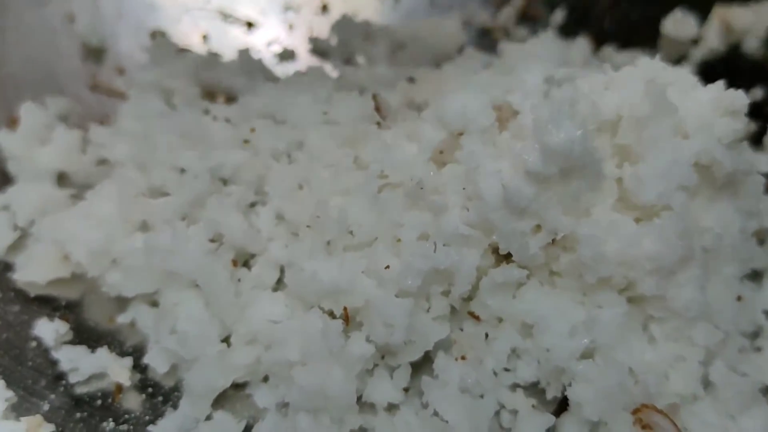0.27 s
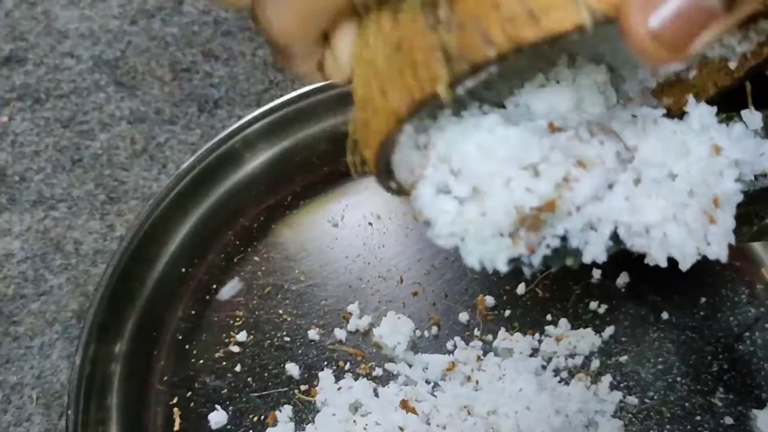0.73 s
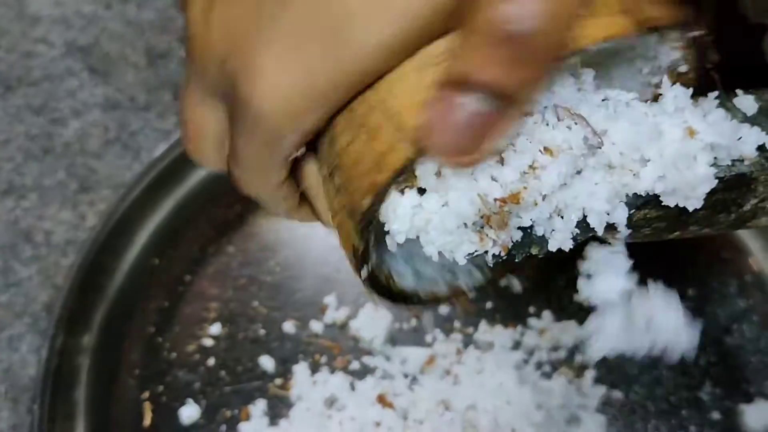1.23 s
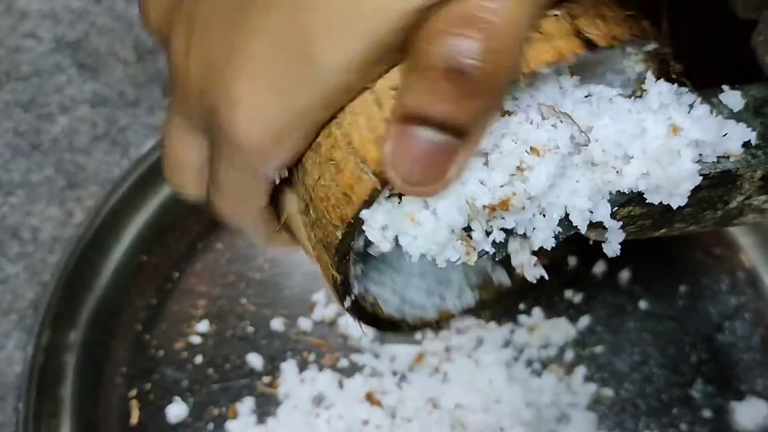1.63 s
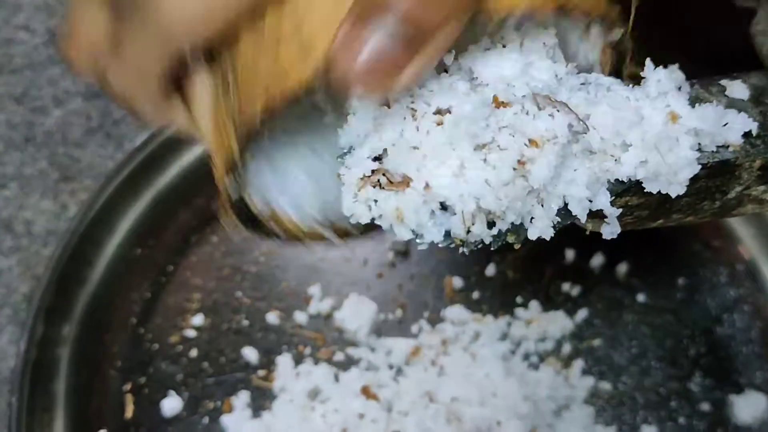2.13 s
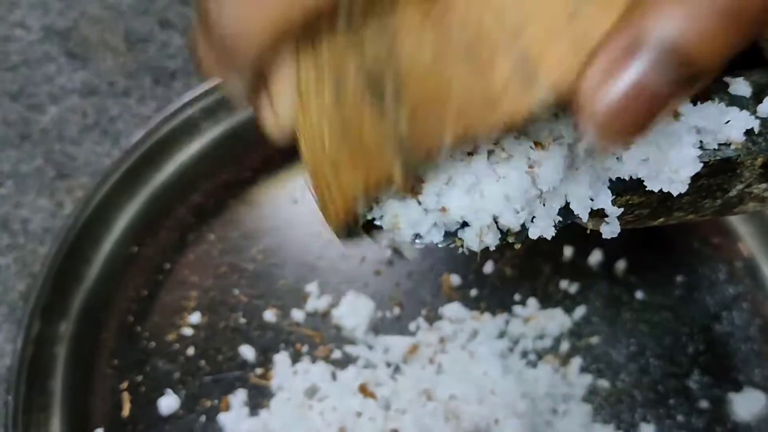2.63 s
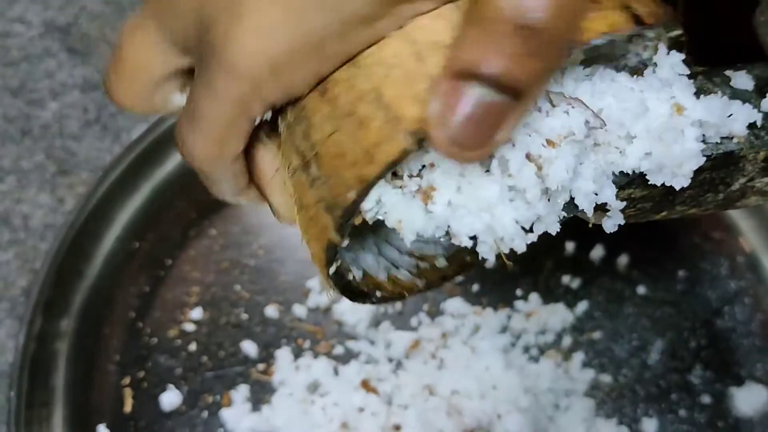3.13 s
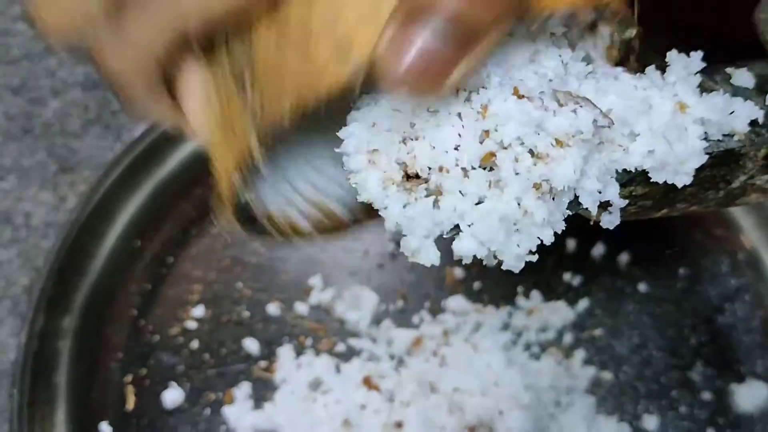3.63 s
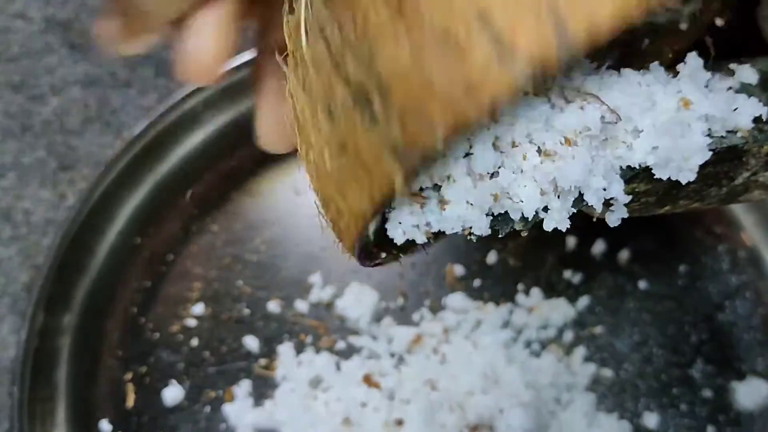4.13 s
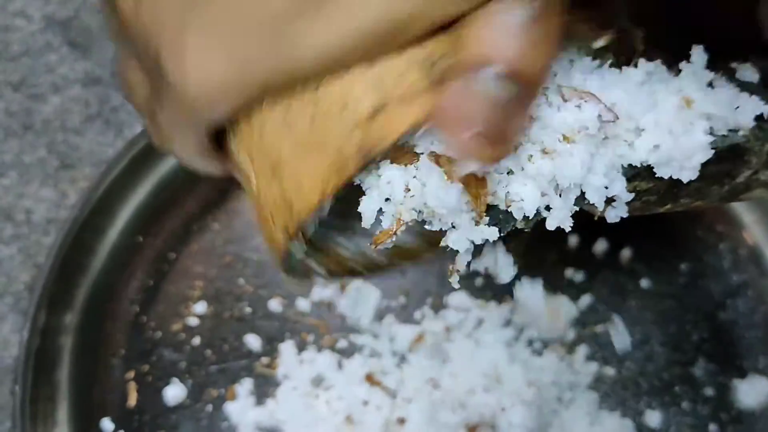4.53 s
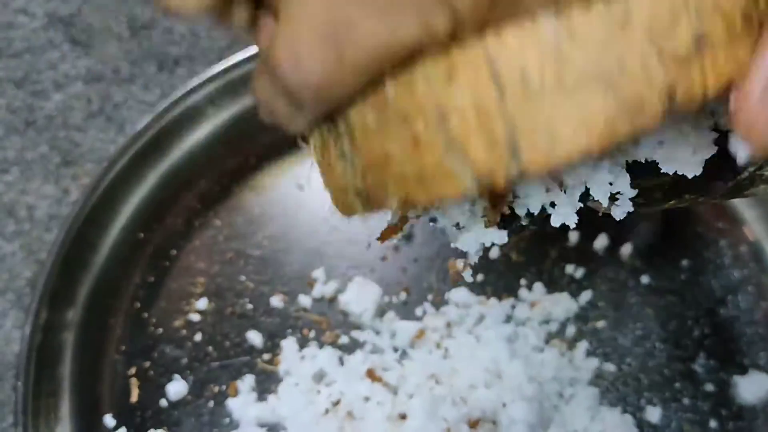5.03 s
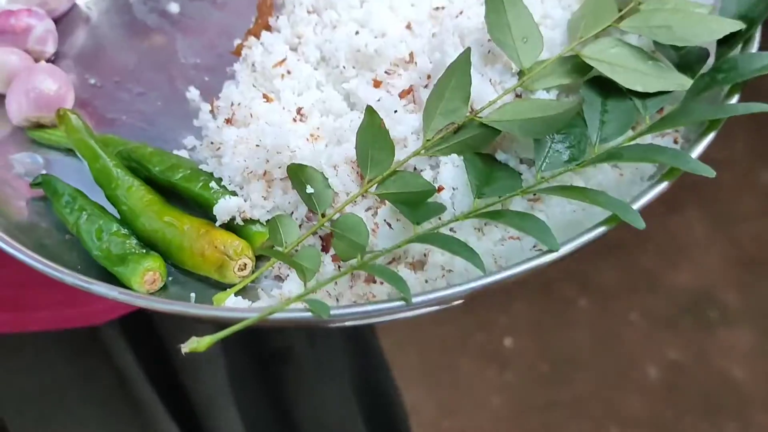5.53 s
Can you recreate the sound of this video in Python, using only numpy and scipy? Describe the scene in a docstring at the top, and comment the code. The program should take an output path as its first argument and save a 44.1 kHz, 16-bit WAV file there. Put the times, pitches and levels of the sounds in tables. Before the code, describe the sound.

Dry, crunchy coconut grating up close, first a single harder scrape, then steady scraping at nearly three strokes a second until a sudden cut.

```python
"""Coconut on a kitchen grater

Half a coconut is worked over the toothed blade of a kitchen grater, nearly three strokes a second.
The teeth tear fibres (bright crackle), rub on the flesh (dry rasp) and stick and slip, so the shell judders.
One harder scrape is heard from close by; the steady strokes follow from another spot and stop abruptly.
Random snaps excite resonances of shell, blade and fibres; filtered noise adds a faint hiss and hush."""
import sys
import numpy as np
from scipy import signal
from scipy.fft import rfft, irfft
from scipy.io import wavfile
from scipy.ndimage import uniform_filter1d

SR = 44100
rng = np.random.default_rng(int(sys.argv[2]) if len(sys.argv) > 2 else 0)


def inscribe(sig):
    """Save sig as 16-bit PCM at rate SR to the path in sys.argv[1].

    A 1-D sig is mono; a 2-D sig holds one channel per row.
    Samples are clipped to [-1, 1] before scaling.
    """
    pcm = np.round(np.clip(np.atleast_2d(sig).T, -1, 1) * 32767)
    wavfile.write(sys.argv[1], SR, pcm.astype(np.int16))


N = 254898
TIME = np.arange(N) / SR

# Levels in the tables are relative: the layers that use them add gains of their own.
NEAR_SPAN_S, GRATING_SPAN_S, BRUSH_SPAN_S = (0, .731), (.772, 5.406), (.785, 5.4)

# a tooth catches and lets go: (time [s], shell level [dB], blade level [dB], fibre level [dB])
NEAR_CATCHES = [(0.0221, -54, -41, -36), (0.0286, -20, -21.5, -38), (0.0953, -26, -22.5, -45),
                (0.152, -26, -30, -41), (0.161, -29, -31, -35), (0.2824, -21, -23, -33),
                (0.362, -24, -24, -30.5), (0.382, -27, -19.5, -37), (0.4006, -23.5, -26.5, -27),
                (0.415, -15.5, -18, -25), (0.4754, -23.5, -23, -30), (0.506, -31.5, -37, -35),
                (0.5694, -48, -27.5, -47), (0.6721, -28, -39.5, -32), (0.6826, -19.5, -9.5, -38),
                (0.714, -23, -10.5, -31), (0.7226, -26, -16, -38)]
CATCHES = [(0.868, -33, -36, -44), (0.889, -21, -50, -39), (0.9409, -23, -30.5, -37),
           (0.965, -26.5, -27.5, -53), (0.986, -32, -24, -27.5), (1.066, -32.5, -27.5, -41),
           (1.153, -44, -26.5, -39), (1.178, -37.5, -36, -64), (1.2235, -26, -20.5, -38),
           (1.332, -15, -31, -40), (1.42, -30, -24, -66), (1.502, -31, -27, -38), (1.528, -37, -34, -55),
           (1.569, -35, -27.5, -33), (1.5826, -23.5, -32, -44), (1.849, -43.5, -28.5, -53.5),
           (1.864, -36.5, -28.5, -52), (1.8826, -25.5, -21, -38), (1.915, -34, -16.5, -37),
           (1.9532, -29, -17, -19), (1.976, -12, -29, -40), (2.0374, -16.5, -35, -33),
           (2.0581, -12.5, -16, -31), (2.155, -41, -39, -47), (2.271, -28, -42, -46),
           (2.339, -25.5, -24.5, -39.5), (2.4215, -23, -40, -30), (2.428, -22.5, -33, -37),
           (2.451, -22.5, -26, -55), (2.4728, -23.5, -30, -53), (2.644, -32.5, -24.5, -51.5),
           (2.687, -30.5, -40, -48), (2.722, -23, -36, -28), (2.8093, -22.5, -32, -40),
           (2.844, -25.5, -24.5, -30.5), (2.924, -38, -45, -58), (3.034, -37, -29, -40.5),
           (3.087, -25.5, -34, -44), (3.1028, -17.5, -38, -26), (3.149, -22.5, -45, -30),
           (3.428, -30, -30, -45), (3.4793, -22, -26.5, -29.5), (3.518, -21, -42, -30),
           (3.599, -28, -28, -29), (3.658, -36, -32, -34.5), (3.766, -16.5, -21, -36),
           (3.7948, -28.5, -15, -24), (3.8115, -14.5, -21, -25.5), (3.929, -19.5, -26, -25),
           (4.124, -41, -31, -47), (4.142, -30, -27.5, -52), (4.1875, -24, -18.5, -36),
           (4.414, -19, -35, -35), (4.4499, -20.5, -25, -34.5), (4.4927, -24, -32, -45),
           (4.731, -18.5, -23, -36), (4.7452, -17.5, -21.5, -39), (4.763, -18.5, -31, -43),
           (4.794, -21, -37, -37), (4.855, -19, -22, -25), (4.869, -28.5, -18.5, -33.5),
           (5.058, -20.5, -31, -47), (5.174, -20.5, -33.5, -34), (5.2402, -16, -18, -31.5),
           (5.249, -19.5, -27, -43.5), (5.29, -21, -32, -47), (5.3476, -30, -38, -49)]
CATCH_VARY_OCT, CATCH_VARY_DB = 0.047, 2.5   # spread of each resonance from catch to catch
# the hardest pushes thump the grater's base: (time [s], level [dB])
THUMPS = [(0.883, -25), (1.948, -24), (1.972, -15.5), (3.432, -27), (4.743, -30)]

# the long close scrape: (time [s], shell level [dB], blade level [dB], fibre level [dB])
NEAR_PUSH = [(0.134, -60, -52, -49), (0.153, -33, -31, -39.5), (0.195, -33, -29, -32.5),
             (0.255, -24.5, -27.5, -34.5), (0.269, -26.5, -33.5, -41), (0.327, -33, -34, -41),
             (0.397, -34, -38.5, -39), (0.419, -30.5, -21, -37.5), (0.428, -28, -29.5, -30.5),
             (0.509, -33.5, -37, -46), (0.544, -52, -62, -59)]
# brief rubs while the shell is set on the blade and taken off:
# (time [s], length [s], shell level [dB], blade level [dB], fibre level [dB])
NEAR_RUBS = [(0.022, 0.056, -39.5, -47.5, -47.5), (0.087, 0.019, -32.5, -45, -49),
             (0.566, 0.011, -37, -49, -52), (0.667, 0.017, -29.5, -34.5, -48), (0.707, 0.01, -24, -29, -41)]
# the teeth bite into the flesh; a forward stroke stalls and goes on in surges:
# (time [s], length [s], shell level [dB], blade level [dB], fibre level [dB], change start to end [dB])
BITES = [(0.859, 0.045, -33, -46, -47.5, 5.5), (0.931, 0.07, -30.5, -44.5, -49, 5.5),
         (1.206, 0.051, -31, -40.5, -40, 5), (1.26, 0.072, -30, -40, -40, 9.5),
         (1.352, 0.022, -30, -45.5, -50.5, -15), (1.571, 0.13, -30, -41.5, -39.5, -1.5),
         (1.73, 0.015, -30.5, -47, -47, -6.5), (1.921, 0.071, -21, -33, -35, 1.5),
         (2.022, 0.06, -25.5, -37, -38, -4), (2.088, 0.031, -33, -45.5, -49, -8.5),
         (2.273, 0.056, -37, -47.5, -47, 3), (2.336, 0.051, -24.5, -38, -36.5, -0.5),
         (2.414, 0.012, -31.5, -40.5, -39.5, -5), (2.455, 0.02, -32, -42, -42.5, -12),
         (2.675, 0.083, -28, -40.5, -40, 4), (2.776, 0.03, -31.5, -44, -40.5, 8),
         (2.854, 0.014, -32.5, -54, -57, -17), (3.006, 0.017, -29.5, -63, -65, 0),
         (3.044, 0.11, -32, -39.5, -40.5, -5.5), (3.174, 0.066, -35.5, -46.5, -42.5, 0),
         (3.411, 0.03, -27.5, -37, -39.5, -1.5), (3.462, 0.084, -33, -42.5, -41.5, -5),
         (3.547, 0.08, -34, -44, -42.5, -4.5), (3.787, 0.025, -23.5, -37, -37, 0.5),
         (3.849, 0.053, -27.5, -40, -35, 2), (3.926, 0.086, -27, -40.5, -38.5, 2),
         (4.031, 0.016, -32, -45, -46, 1), (4.393, 0.064, -25.5, -37, -37, 7),
         (4.485, 0.0082, -30, -34.5, -35.5, -2), (4.72, 0.066, -28, -38.5, -36.5, -4),
         (4.79, 0.077, -25.5, -36, -34, 7.5), (4.876, 0.051, -34.5, -44.5, -40, -5.5),
         (5.035, 0.011, -31.5, -42.5, -36, 11), (5.131, 0.11, -26, -36.5, -34.5, 6.5),
         (5.266, 0.012, -24, -36, -35.5, 5)]
# the shell slides lightly over the teeth between bites:
# (time [s], length [s], shell level [dB], blade level [dB], fibre level [dB])
RETURNS = [(1.135, 0.021, -31.5, -40, -48), (1.472, 0.057, -37.5, -45.5, -65),
           (1.849, 0.085, -41, -42.5, -63), (2.187, 0.077, -38.5, -44.5, -52.5),
           (2.586, 0.07, -36.5, -41.5, -55), (2.97, 0.054, -34, -43.5, -48.5),
           (3.33, 0.064, -32, -39, -48.5), (3.704, 0.12, -35.5, -38.5, -46.5),
           (4.134, 0.029, -32.5, -44, -57), (4.351, 0.04, -32, -40, -42.5), (4.529, 0.021, -40, -45.5, -45),
           (4.654, 0.05, -34.5, -42.5, -45.5), (5.008, 0.11, -45.5, -45, -54)]
# shape of each kind of movement: (attack [dB/s], release [dB/s], rise of the middle above the ends [dB])
BITE_SHAPE, RETURN_SHAPE, RUB_SHAPE = (1200, 680, 1.4), (650, 730, 2.7), (5060, 630, 0.82)
# brushing between strokes: (shell level [dB], blade level [dB], fibre level [dB])
NEAR_BRUSH_DB, BRUSH_DB = (-58, -69.5, -59), (-56, -64.5, -57)
# moments when the shell is lifted clear: (time [s])
LIFTS = [1.435, 2.14, 2.55, 3.285, 4.29]
LIFT_S, LIFT_DB = 0.08, 5   # half length and depth of the lull
# within a bite the shell lurches from tooth to tooth, and blade and fibres follow in part
LURCHES_PER_S, LURCH_DB, RASP_LURCH_DB = 76, 1.98, 0.52

# Resonances, all as (frequency [Hz], width [Hz], left level [dB], right level [dB])
# the hollow shell, the blade and the tearing fibres, from close by
NEAR_SHELL = [(190, 128, -8.5, -11.5), (315.8, 74, 1.5, 3), (422, 260, -1.5, -23.5), (677, 143, 1, 4),
              (847, 370, -7.5, -30)]
NEAR_BLADE = [(1250, 880, -10, -10), (1782, 300, 11, 7.5), (2080, 195, 6.5, -10.5),
              (2410, 330, -10.5, -5.5)]
NEAR_FIBRE = [(2645, 1110, 2.5, -6), (3750, 200, -20, -14.5), (5000, 270, -27, -6.5),
              (6050, 670, -2.5, -19.5), (7060, 1300, -3.5, -2.5), (8700, 2900, -28.5, -6),
              (11400, 7000, -11.5, -24.5), (15771.0, 3300, -7, -13.5)]
# the knock of the shell's rim on the blade, and the thin ring of the teeth, from close by
NEAR_RIM = [(920, 115, 11, 8), (1266, 380, -12, 0), (1670, 250, 10.5, -3), (2060, 180, -9.5, -19),
            (2800, 1000, -12.5, -22)]
NEAR_TEETH = [(2860, 320, 0.0062, -2)]
# shell, blade, fibres and woody rim knock in the steady strokes
SHELL = [(136.3, 110, -32.5, -33.5), (181.8, 31, -17.5, -20.5), (254, 44, -14, -26), (361.2, 84, -6, -6.5),
         (429, 85, 0, -3), (500, 31, -7.5, -18), (636, 56.5, -8, -4), (687.3, 59, -13.5, -2.5),
         (930, 430, -23, -27.5)]
BLADE = [(1090, 320, 1.5, 0), (1473, 95, -3.5, -1.5), (1820, 710, -0.5, 1.5), (2095, 17, 9, -37.5),
         (2444, 450, 4.5, -3)]
FIBRE = [(3194, 460, 4.5, -5), (3650, 1180, -5, -25.5), (5060, 758, -11, -11), (6440, 1180, -1, -14),
         (7500, 1900, -30.5, -4), (9820, 2640, -9.5, -13), (12820, 2541.0, -23, -21.5),
         (17800, 6400, -2.5, -9.5)]
RIM = [(885, 160, -2, -25), (1140, 970, 5.5, 7), (1660, 120, -15.5, 7.5), (2430, 380, 0, 0.5)]
# the grater's base
BASE = [(132, 23, -22.5, -16), (190, 25, 10, 7), (254, 140, -2.5, -8)]
# the light slide, the shell's hollow during it, and its thin wet hiss
SLIDE = [(1150, 900, 1, 2), (2030, 540, -3.5, 1), (2465, 500, -1.5, -23)]
HOLLOW = [(1260, 390, -7.5, 0.0013)]
WET_HISS = [(3310, 960, 1.5, -9.5), (3920, 820, -2, -4), (6630, 2100, 2, -4), (7440, 1600, -10.5, 3),
            (9800, 2500, -12, -10.5), (12700, 3700, -8.5, -13.5), (15500, 2840, -5.5, -15)]
# chips of flesh that break off under load; each chip rings at one of these
CHIPS = [(961, 370, 4, -0.5), (1396, 150, -5.5, -5.5), (1770, 160, 4.5, 1), (2120, 170, 5.5, 0.5),
         (2500, 190, 4, 0), (2880, 200, -3.5, -11.5), (3263, 220, 1.5, -8), (3690, 240, -1, -6)]
# the teeth on the bare, less damped shell
BARE = [(700, 100, 4, 6.5), (796, 210, -7, 0), (1792, 360, 0, -3.5), (2500, 380, -7, -6.5),
        (3410, 530, 0.5, -6.5)]
# thin wet rustle of the shreds
SQUISH = [(7160, 900, 2.5, -4.5), (9860, 1300, 0, -5.5)]

NEAR_SINK_OCT_PER_S = 0.27   # the blade's ring sinks through the close scrape
NEAR_TEETH_RISE_OCT_PER_S, NEAR_TEETH_DB = 0.93, -4.5   # the teeth's ring climbs; gain against the fibres
SLIDE_RISE_OCT_PER_S, SLIDE_RANGE_OCT = 3.4, 0.15   # the hollow ring rises as the shell is drawn back
SHELL_WANDER_OCT = .08   # the shell's ring wanders as the grip on it changes
FIBRE_WANDER_OCT = .04   # the colour of the close tearing wanders as the shell turns
FLICKER_PER_S = 60   # how fast the colour of the tearing changes
CHIPS_PER_S, CHIP_DB = 700, -4.5   # gain against the blade's rasp
# as the flesh wears thin the teeth reach the hard shell: (from [s], full by [s])
BARE_SPAN_S, BARE_DB = (3.44, 4.12), -1
SQUISH_DB, SQUISH_FOLLOWS, SQUISH_WANDER_OCT = -27.5, 0.63, 0.055   # gain, share of the fibres' swing, wander

# spectra of the faint hiss under the strokes and of the hush: (frequency [Hz], level per Hz [dB])
HISS = [(40, -4), (400, 15), (700, 2), (1500, -0.5), (3000, 2.5), (4700, -33), (7200, -12.5), (9000, -25.5),
        (13000, -11.5), (16000, -8)]
HUSH = [(24, -55.5), (40, -20), (262, -3.5), (312, -6.5), (382, -0.5), (433, -6), (1210, -14),
        (1590, -17.5), (16000, -30.5)]
HISS_DB, HUSH_DB, HUSH_SWELL_DB_PER_S = -58.5, -93.5, 24
OPENING_DB, OPENING_S = 13.5, .2   # how low the hiss starts, and time constant of its rise
# weak early echoes: (delay [s])
ECHO_DELAYS_S = (.0013, .0029, .0047)
CUTOFF_HZ = 15950


def from_db(db):
    """Logarithmic level: decibels to amplitude gain."""
    return 10 ** (np.asarray(db) / 20)


def rms_one(x):
    """Mean-square normalisation: scale to unit power."""
    return x / np.sqrt(np.mean(x ** 2) + 1e-20)


def during(span):
    """Gating: one inside the span, zero outside, with short ramps."""
    inside = (TIME >= span[0]) & (TIME < span[1])
    return uniform_filter1d(inside * 1., size=128)


def drift(rate):
    """Band-limited randomness: chance values joined by straight lines, with spread 1."""
    knots = rng.standard_normal(4096)
    return rms_one(np.interp(TIME * rate, np.arange(len(knots)), knots))


def air(spectrum, apart):
    """Spectral shaping: white noise filtered to a given colour, partly shared by both sides; unit power."""
    hz, db = np.transpose(spectrum)
    log_hz = np.log(np.fft.rfftfreq(N, 1 / SR) + 1)
    gain = from_db(np.interp(log_hz, np.log(hz), db))
    white = rng.standard_normal(N) + apart * rng.standard_normal((2, N))
    return rms_one(irfft(rfft(white) * gain, N))


def touching():
    """Loss of contact: gain of light contact and hiss, which die down while the shell is lifted clear."""
    lifted = sum(np.exp(-((TIME - s) / LIFT_S) ** 2) for s in LIFTS)
    return from_db(-LIFT_DB * lifted)


def opening():
    """Exponential approach: gain of the hiss and the light fibre sound as the steady strokes begin."""
    since_start = (TIME - GRATING_SPAN_S[0]).clip(0)
    return from_db(-OPENING_DB * np.exp(-since_start / OPENING_S))


def response(modes, size=2048):
    """Modal resonance: minimum-phase impulse response at the left and right microphone, mean energy one."""
    hz = np.fft.rfftfreq(size, 1 / SR)[:, None] + 1
    centre, width = np.transpose(modes)[:2]
    detuning = (hz ** 2 - centre ** 2) / (hz * width)
    shapes = 1 / (1 + detuning ** 2) ** 2
    power = shapes @ from_db(np.array(modes)[:, 2:]) ** 2
    cepstrum = irfft(np.log(power.T + 1e-9) / 2)
    cepstrum[:, 1:size // 2] *= 2      # minimum phase: nothing rings before the blow
    cepstrum[:, size // 2 + 1:] = 0
    return rms_one(irfft(np.exp(rfft(cepstrum)))) / np.sqrt(size)


def ring(force, modes):
    """Linear response: convolve a force with the impulse response of the resonances."""
    return signal.oaconvolve(np.atleast_2d(force), response(modes), axes=1)[:, :N]


def grains(per_s, spread_db, apart):
    """Shot noise: random snaps of uneven size; apart sets how differently each reaches the two sides."""
    born = rng.random(N) < per_s / SR
    size = from_db(spread_db * np.minimum(rng.exponential(1, N), 4))
    signs = rng.choice([-1, 1], N) + apart * rng.standard_normal((2, N))
    snaps = born * size * signs
    # divide by the short-term level, so chance clusters of snaps do not stand out
    power = uniform_filter1d(np.mean(snaps ** 2, axis=0), size=1300).clip(0)
    return snaps / np.sqrt(power + 1e-9)


def stick_slip(rate, depth_db):
    """Stick-slip friction: the grip of the teeth tightens and gives way unevenly; power held near one."""
    grip = from_db(depth_db * drift(rate))
    return grip / np.sqrt(uniform_filter1d(grip ** 2, size=2000))


def even_level(sound):
    """Level evening: divide a sound by its own short-term level, so the envelopes alone set its loudness."""
    power = uniform_filter1d(np.mean(sound ** 2, axis=0), size=1100)
    return sound / np.sqrt(np.abs(power) + 1e-6)


def glide(sound, octaves):
    """Variable-rate reading: shift a sound by a changing number of octaves."""
    at = np.cumsum(2 ** octaves) % N
    return np.array([np.interp(at, np.arange(N), side) for side in sound])


def one_by_one(force, modes, flicker_db):
    """Independent modes: each snap rings just one resonance, and each resonance swells and fades by itself."""
    dealt = rng.integers(0, len(modes), N)
    energy = np.array([width * np.sum(from_db(sides) ** 2) for _, width, *sides in modes])
    gains = np.sqrt(energy / energy.mean())
    total = 0
    for k, mode in enumerate(modes):
        share = force * (dealt == k) * stick_slip(FLICKER_PER_S, flicker_db)
        total = total + gains[k] * ring(share, [mode])
    return total


def catches(times, level_db, modes, crumble, crumble_s, build_s=0.0012):
    """Impulsive release: fibres start to give, the tooth lets go and crumbling follows, each time recoloured."""
    out = np.zeros((2, N + SR))
    lead = 512   # samples before the release
    age = (np.arange(3 * lead) - lead) / SR
    envelope = np.exp(np.minimum(age / build_s, -age / crumble_s))
    scale = np.hypot(1, crumble) / np.abs(response(modes)).max()
    for s, db in zip(times, level_db):
        crumbs = rng.standard_normal(len(age)) * envelope
        blow = crumble * crumbs / np.linalg.norm(crumbs)
        blow[lead] += 1
        own = np.array(modes, float)   # each spot of contact has its own colour
        own[:, 0] *= 2 ** (CATCH_VARY_OCT * rng.standard_normal(len(own)))
        own[:, 2:] += CATCH_VARY_DB * rng.standard_normal((len(own), 1))
        sound = signal.fftconvolve(blow[None], response(own), axes=1)
        at, length = round(s * SR) - lead, sound.shape[1]
        out[:, at:at + length] += from_db(db) * scale * rms_one(sound) / np.sqrt(length)
    return out[:, :N]


def left_late(x, lag_s):
    """Interaural delay: the source lies a little nearer the right microphone."""
    return np.array([np.interp(TIME - lag_s, TIME, x[0]), x[1]])


def off_the_plate(x, strength, swing_s):
    """Comb filtering: plate, grater and hands return weak echoes whose delays shift, so the colour wanders."""
    out = x
    for delay_s in ECHO_DELAYS_S:
        echo_time = TIME - delay_s - swing_s * drift(rate=9)
        echo = np.array([np.interp(echo_time, TIME, side) for side in x])
        out = out + strength * echo
    return out / np.sqrt(1 + len(ECHO_DELAYS_S) * strength ** 2)


def kitchen(x, t60, wet_db):
    """Reverberation: the walls return a short, dull tail, different on each side."""
    age = np.arange(16384) / SR
    tail = rng.standard_normal((2, len(age))) * from_db(-60 * age / t60) * (age > .004)
    tail = signal.sosfilt(signal.butter(1, 5000, fs=SR, output="sos"), tail)
    tail /= np.linalg.norm(tail, axis=1, keepdims=True)
    return x + from_db(wet_db) * signal.oaconvolve(x, tail, axes=1)[:, :N]


def stroke(start_s, length_s, levels_db, shape, change_db=0):
    """Envelope of one movement: shell, blade and fibre power in attack, a hold that leans and arches, release."""
    attack_db_per_s, release_db_per_s, arch_db = shape
    along = np.clip((TIME - start_s) / length_s, 0, 1) - .5
    hold_db = change_db * along - arch_db * (2 * along) ** 2
    attack_db = attack_db_per_s * (start_s - TIME).clip(0)
    release_db = release_db_per_s * (TIME - start_s - length_s).clip(0)
    envelope = from_db(np.maximum(hold_db - attack_db - release_db, -120))
    return np.outer(from_db(levels_db), envelope) ** 2


def light_contact(moves, shape, brush_db, span):
    """Addition of powers: the light movements and the brushing between them."""
    brushing = np.outer(from_db(brush_db), during(span)) ** 2
    return brushing + sum(stroke(s, length, levels, shape) for s, length, *levels in moves)


def near_gains():
    """Amplitude from summed power: shell, blade and fibre sound in the close scrape and the rubs around it."""
    s, *levels = np.transpose(NEAR_PUSH)
    push = from_db([np.interp(TIME, s, db) for db in levels]) * during((s[0], s[-1]))
    return np.sqrt(push ** 2 + light_contact(NEAR_RUBS, RUB_SHAPE, NEAR_BRUSH_DB, NEAR_SPAN_S))


def into_push():
    """Time origin: seconds from the middle of the close scrape, held at its ends."""
    start, end = NEAR_PUSH[0][0], NEAR_PUSH[-1][0]
    return np.clip(TIME, start, end) - (start + end) / 2


def near_scrape():
    """Friction-driven resonance: one long hard scrape, with knocks of the shell before, during and after."""
    shell, blade, fibre = near_gains()
    grip = stick_slip(rate=190, depth_db=-1.5)

    judder = even_level(ring(grip * grains(700, spread_db=3.0, apart=.45), NEAR_SHELL))
    judder = shell * glide(judder, SHELL_WANDER_OCT * drift(rate=12))

    rubbing = ring(grains(700, spread_db=1.5, apart=0.46), NEAR_BLADE)
    rasp = blade * grip * glide(rubbing, -NEAR_SINK_OCT_PER_S * into_push())
    teeth = ring(grains(1700, spread_db=11.5, apart=0.57), NEAR_TEETH)
    teeth = glide(teeth, NEAR_TEETH_RISE_OCT_PER_S * into_push())
    rasp += from_db(NEAR_TEETH_DB) * fibre * grip * teeth

    tearing = one_by_one(grains(14000, spread_db=-0.5, apart=1.7), NEAR_FIBRE, flicker_db=1.7)
    tearing = fibre * grip * glide(tearing, FIBRE_WANDER_OCT * drift(rate=14))
    tearing = off_the_plate(tearing, strength=0.37, swing_s=.0001)

    s, shell_db, blade_db, fibre_db = np.transpose(NEAR_CATCHES)
    knocks = from_db(2.5) * catches(s, shell_db, NEAR_SHELL, crumble=0.89, crumble_s=0.0062)
    knocks += from_db(-3.5) * catches(s, blade_db, NEAR_RIM, crumble=0.55, crumble_s=0.0036)
    knocks += from_db(1.0) * catches(s, fibre_db, NEAR_FIBRE, crumble=3.6, crumble_s=0.0016)

    dry = judder + from_db(0.5) * left_late(rasp, lag_s=0.0002) + from_db(3.0) * tearing + knocks
    return kitchen(dry * during(NEAR_SPAN_S), t60=0.035, wet_db=-19.5)


def grating_gains():
    """Amplitude from summed power: shell, blade and fibre sound, and the share of the rasp that is sliding."""
    biting = sum(stroke(s, length, levels, BITE_SHAPE, change_db) for s, length, *levels, change_db in BITES)
    lurch = from_db(np.outer([LURCH_DB, RASP_LURCH_DB, RASP_LURCH_DB], drift(LURCHES_PER_S)))
    light = light_contact(RETURNS, RETURN_SHAPE, BRUSH_DB, BRUSH_SPAN_S) * touching() ** 2
    light[2] *= opening() ** 2   # fibres only
    total = biting * lurch ** 2 + light
    return np.sqrt(total), light[1] / total[1]


def slide_pitch():
    """Cavity tuning: octaves of the hollow ring about its mean as it climbs through each return."""
    middles = np.array([s + length / 2 for s, length, *_ in RETURNS])
    nearest = middles[np.searchsorted((middles[1:] + middles[:-1]) / 2, TIME)]
    return np.clip(SLIDE_RISE_OCT_PER_S * (TIME - nearest), -SLIDE_RANGE_OCT, SLIDE_RANGE_OCT)


def grating_rasp(blade, grip, slide, bite):
    """Friction on flesh, chips and bare shell: rubbing shares the shell's grip; slides skid on their own."""
    rubbing = grip * grains(2200, spread_db=1.1, apart=.7)
    chips = one_by_one(grains(CHIPS_PER_S, spread_db=2.0, apart=.5), CHIPS, flicker_db=3.0)
    skidding = stick_slip(rate=37, depth_db=3.0) * grains(600, spread_db=1.0, apart=0.67)
    rasp = ring(blade * bite * rubbing, BLADE)
    rasp += from_db(CHIP_DB) * blade * bite * glide(chips, 0.067 * drift(rate=18))
    rasp += from_db(-0.5) * one_by_one(blade * slide * skidding, SLIDE, flicker_db=0.0)
    rasp += from_db(-3.5) * blade * slide * glide(ring(skidding, HOLLOW), slide_pitch())
    bare = from_db(BARE_DB) * np.interp(TIME, BARE_SPAN_S, [0, 1])
    harsh = grip * grains(2600, spread_db=1.0, apart=0.88)
    return rasp + ring(bare * blade * bite * harsh, BARE)


def grating_tearing(fibre, slide, bite):
    """Fracture noise: fibres crackle in the bites, hiss wetly in the slides, and shreds rustle."""
    crackle = fibre * stick_slip(rate=150, depth_db=1.5) * grains(14000, spread_db=1.56, apart=3.6)
    tearing = one_by_one(bite * crackle, FIBRE, flicker_db=2.5)
    tearing += one_by_one(slide * crackle, WET_HISS, flicker_db=4.5)
    squish = ring(grains(3000, spread_db=2.0, apart=2.6), SQUISH)
    squish = glide(squish, SQUISH_WANDER_OCT * drift(rate=19))
    swing = fibre ** SQUISH_FOLLOWS * stick_slip(rate=91, depth_db=6)
    return tearing + from_db(SQUISH_DB) * swing * squish


def grating():
    """Common excitation: in stroke after stroke one uneven grip drives the shell's judder and the blade's rasp."""
    (shell, blade, fibre), sliding = grating_gains()
    slide, bite = np.sqrt(sliding), np.sqrt(1 - sliding)
    grip = stick_slip(rate=130, depth_db=2.5)

    judder = even_level(ring(grip * grains(900, spread_db=2.5, apart=0.084), SHELL))
    judder = shell * glide(judder, SHELL_WANDER_OCT * drift(rate=22))
    rasp = grating_rasp(blade, grip, slide, bite)
    tearing = grating_tearing(fibre, slide, bite)

    s, shell_db, blade_db, fibre_db = np.transpose(CATCHES)
    thuds = from_db(-3.5) * catches(s, shell_db, SHELL, crumble=1.06, crumble_s=0.0071, build_s=.004)
    thuds += from_db(-10.0) * catches(*np.transpose(THUMPS), BASE, crumble=0.062, crumble_s=0.0053)
    clacks = from_db(-4.0) * catches(s, blade_db, RIM, crumble=1.32, crumble_s=0.0045, build_s=.003)
    snaps = from_db(-1.0) * catches(s, fibre_db, FIBRE, crumble=4.0, crumble_s=0.0055, build_s=.005)

    body = from_db(-5.0) * judder + thuds + clacks
    edge = left_late(from_db(-0.75) * rasp, lag_s=0.00019) + from_db(-0.5) * tearing + snaps
    dry = left_late(body, lag_s=.00008) + off_the_plate(edge, strength=0.36, swing_s=0.000396)
    return kitchen(dry, t60=0.15, wet_db=-18.5) * during(GRATING_SPAN_S)


def scene():
    """Superposition: both bouts of grating over a faint background, which swells a little at the end."""
    hiss_gain = during(NEAR_SPAN_S) + opening() * during(GRATING_SPAN_S)
    hiss = from_db(HISS_DB) * air(HISS, apart=0.47) * hiss_gain * touching()
    hush_db = HUSH_DB + HUSH_SWELL_DB_PER_S * (TIME - GRATING_SPAN_S[1]).clip(0)
    hush = from_db(hush_db) * air(HUSH, apart=.5)
    return near_scrape() + grating() + hiss + hush


def record(dry):
    """Low-pass filtering: an elliptic filter cuts the top steeply."""
    return signal.sosfilt(signal.ellip(12, .2, 80, CUTOFF_HZ, fs=SR, output="sos"), dry)


dry = scene()
out = record(dry)
inscribe(out)
```